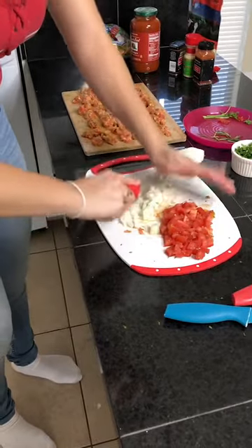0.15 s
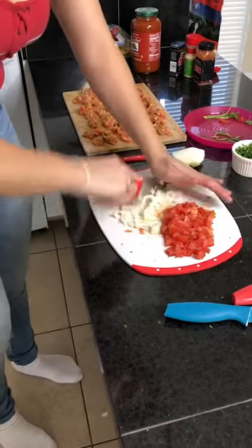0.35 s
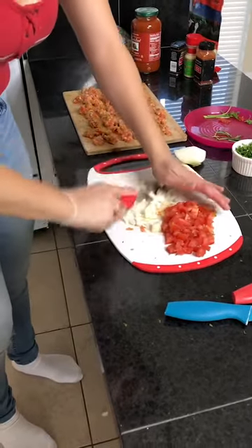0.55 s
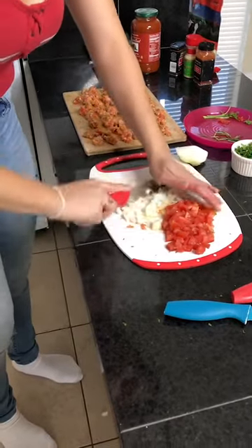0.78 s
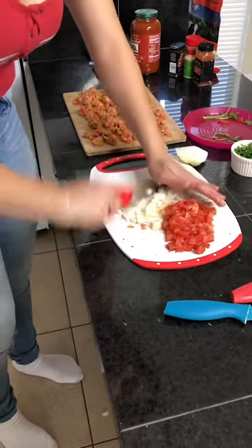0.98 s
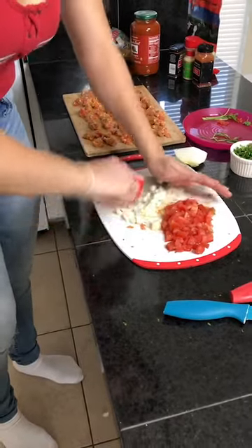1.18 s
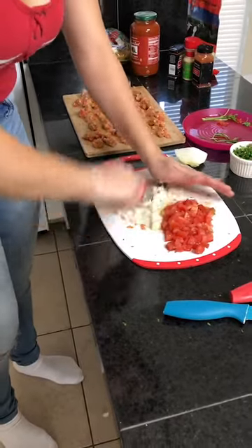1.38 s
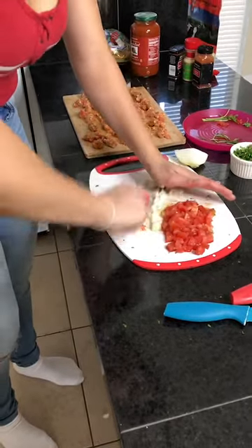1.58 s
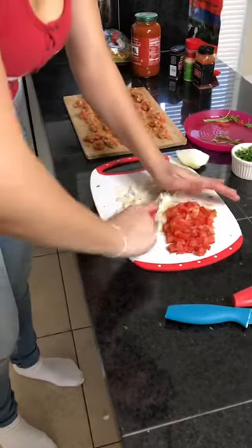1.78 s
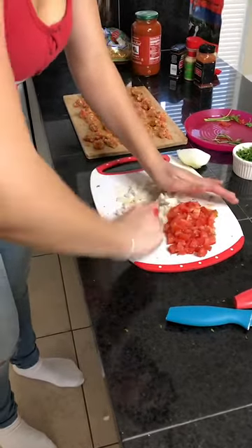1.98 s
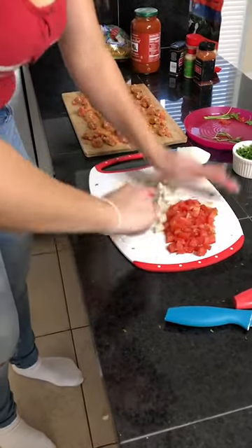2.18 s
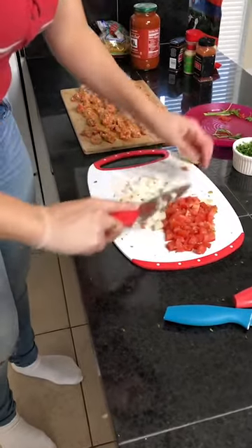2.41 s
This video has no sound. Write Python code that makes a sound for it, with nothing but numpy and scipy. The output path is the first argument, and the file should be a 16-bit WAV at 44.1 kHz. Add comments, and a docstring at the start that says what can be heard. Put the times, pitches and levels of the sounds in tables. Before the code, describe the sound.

A small knife chops onion on a plastic board, eight even strokes about a quarter second apart, starting at 0.2 seconds. Each is a short wet crunch with a hollow knock, and faint snaps of onion fall between them. The last stroke, at about 2 seconds, lands hardest with a sharp clack. The small kitchen adds a brief echo, and a faint, low appliance hum runs throughout.

```python
"""Chopping onion

A small knife chops onion on a plastic board in a kitchen: eight strokes, about four a second.
Each is a wet crunch of bursting cells, with knocks as the blade breaks through layers and meets
the board. The counter and a small, hard room answer, over the low hum of an appliance."""
import sys
import numpy as np
from scipy import signal
from scipy.fft import rfft, irfft, next_fast_len
from scipy.io import wavfile

SR = 44100
rng = np.random.default_rng(int(sys.argv[2]) if len(sys.argv) > 2 else 0)


def digitize_waveform(pressure):
    """Quantize a signal to 16-bit integers and store it at the path in sys.argv[1].

    Rows of a 2-D input are taken as channels; values are limited to [-1, 1].
    """
    field = np.atleast_2d(pressure).T
    bounded = np.clip(field, -1, 1)
    quanta = np.round(bounded * 32767).astype(np.int16)
    wavfile.write(sys.argv[1], SR, quanta)


N = 108045
T = np.arange(N) / SR

# The bright tone of bursting onion cells. Each row: frequency in Hz, relative level in dB.
CRUNCH_EQ = [(300, -20), (800, -6.5), (1500, 2), (2800, 2), (5000, 1), (8000, 0), (12000, -3), (16000, -3)]


def undb(db):
    """Decibels to gain."""
    return 10 ** (np.asarray(db) / 20)


def unit(x):
    """Scale to rms 1."""
    return x / np.sqrt(np.mean(x ** 2))


def colour(x, points):
    """Minimum-phase EQ through (Hz, dB) points that keeps the power of white noise."""
    hz, db = np.array(points, float).T
    size = next_fast_len(2 * len(x), True) * 2
    bin_hz = np.arange(size // 2 + 1) * SR / size
    gain = unit(undb(np.interp(np.log(bin_hz + 1), np.log(hz), db)))
    cepstrum = irfft(np.log(gain))
    cepstrum[1:size // 2] *= 2
    cepstrum[size // 2 + 1:] = 0
    return irfft(rfft(x, size) * np.exp(rfft(cepstrum)))[:len(x)]


def fade(t60):
    """Decay of 60 dB in t60 seconds."""
    return np.exp(-np.log(1000) * T / t60)


def add(out, start, x):
    """Mix a sound in from its start time."""
    i = max(int(start * SR), 0)
    out[i:] += x[:N - i]


def drift(step_s):
    """A random glide with a spread near 1 and a new target every step."""
    return 1.17 * np.interp(T / step_s, np.arange(N), rng.standard_normal(N))


def appliance():
    """A low rush of air with a few wavering motor tones."""
    # The dark tone of the air. Each row: frequency in Hz, relative level in dB.
    air_eq = [(20, -32), (31, -32), (40, -34), (58, -1), (100, -4), (150, 2), (230, -3.5), (400, -6.5),
              (650, -12), (1100, -13), (2000, -23.5), (4000, -28.5), (9000, -37.5), (16000, -44.5)]
    # The motor's hum. Each row: frequency in Hz, rms level in dB.
    motor_tones = [(60.4, -69.5), (160.5, -66.5), (296, -66), (320.7, -72.5), (473.5, -71)]
    air_db, waver_hz = -52.5, 1.17
    out = undb(air_db) * unit(colour(rng.standard_normal(N), air_eq))
    for hz, db in motor_tones:
        cycles = np.cumsum(hz + waver_hz * drift(step_s=0.1195)) / SR
        out += undb(db) * np.sqrt(2) * np.sin(2 * np.pi * cycles)
    return out


def cell_bursts():
    """A dense crackle of tiny pops, mostly weak, surging as each layer of onion gives way."""
    bursts_per_s, spread_db, surge_db = 7000, 2, 2
    bursts = rng.random(N) < bursts_per_s / SR
    db = spread_db * np.minimum(rng.exponential(size=N), 4) + surge_db * drift(step_s=0.003)
    return unit(bursts * np.sign(rng.standard_normal(N)) * undb(db))


def loose_pieces():
    """Bits of onion snap or are nudged, and once the blade brushes lightly over the pile."""
    # Small snaps. Each row: start in seconds, level in dB, decay time constant in seconds.
    snap_cues = [(0.114, -55.5, .004), (0.5015, -49.5, 0.0047), (0.769, -55, 0.0073), (0.8263, -43, .0015),
                 (1.122, -47.5, 0.0068), (1.2665, -73, 0.0031), (2.187, -62, 0.0053)]
    # The rasp of the brush. Each row: frequency in Hz, relative level in dB.
    brush_eq = [(500, -14), (1400, 4), (2500, 5.5), (4000, -5), (7500, -7.5), (11000, 0.5), (13500, -5),
                (16000, -17)]
    brush_start_s, brush_length_s, brush_db = 1.674, 0.036, -53
    progress = np.clip((T - brush_start_s) / brush_length_s, 0, 1)
    brush = undb(brush_db) * np.sqrt(np.abs(np.sin(np.pi * progress)))
    snaps = np.zeros(N)
    for start, db, decay in snap_cues:
        add(snaps, start, undb(db) * np.exp(-T / decay))
    return colour(snaps * cell_bursts(), CRUNCH_EQ) + colour(brush * cell_bursts(), brush_eq)


def knife_cuts():
    """Force grows as the blade sinks in; cells burst and shake the board until the blade stops."""
    # Each row is a stroke: start, rise and hold in seconds, crunch level in dB,
    # board shake level in dB, crunch brightness in dB per octave.
    strokes = [(0.23, 0.024, 0.0058, -43.5, -43.5, 0.5), (0.515, 0.029, 0.015, -45, -43.5, 2),
               (0.786, 0.041, 0.012, -45, -47, -0.8), (1.035, 0.015, 0.017, -44.5, -44.5, 0.5),
               (1.274, 0.0048, 0.022, -41.5, -43.5, 0.2), (1.543, 0.0067, 0.023, -43.5, -46.5, -1),
               (1.779, .005, 0.043, -45.5, -46, 0), (2.011, 0.0042, 0.049, -42.5, -42, -1.2)]
    # The body of the shaken board. Each row: frequency in Hz, relative level in dB.
    board_eq = [(150, -15.5), (350, -7.5), (600, -15), (850, -2), (1100, -2), (1450, -9.5), (2200, -15),
                (4000, -31.5), (10000, -51)]
    entry_force, entry_s, release_s = 0.66, 0.0026, 0.0052
    touch_db, touch_s = -11.5, 0.0089  # the edge eases into the skin before it breaks through
    crunch, shake = np.zeros(N), np.zeros(N)
    for start, rise, hold, crunch_db, shake_db, tilt in strokes:
        age = T - start
        attack = np.clip(age / entry_s, 0, 1)
        press = entry_force + (1 - entry_force) * np.clip(age / rise, 0, 1)
        release = np.exp(-np.maximum(age - rise - hold, 0) / release_s)
        touch = undb(touch_db) * np.exp(-np.abs(age) / touch_s)
        force = np.maximum(attack * press * release, touch)
        tilted_eq = [(hz, db + tilt * np.log2(hz)) for hz, db in CRUNCH_EQ]
        crunch += colour(undb(crunch_db) * force * cell_bursts(), tilted_eq)
        shake += undb(shake_db) * force
    return crunch + colour(shake * cell_bursts(), board_eq)


def ring(modes, pitch, detune):
    """Struck modes, tuned slightly differently at each spot on the board."""
    tuning = pitch * (1 + detune * rng.standard_normal(len(modes)))
    return sum((-1) ** (k // 2) * undb(db) * fade(t60) * np.sin(2 * np.pi * hz * tuning[k] * T)
               for k, (hz, db, t60) in enumerate(modes))


def board_knocks():
    """The edge cracks and clacks on the plastic, then the board gives a short hollow thud."""
    # Each row is a knock: start in seconds, thud peak in dB, thud pitch ratio, clack peak in dB,
    # relative crack level in dB.
    hits = [(.2280, -34.5, 0.97, -55, -57), (.2428, -31.5, 0.99, -48, -44), (0.2548, -34.5, 1.54, -31, -29),
            (0.2672, -32, 0.74, -45, -48), (0.5417, -27, 0.92, -30.5, -40),
            (0.5541, -23.5, 1.01, -25.5, -43), (0.7843, -34, 1.43, -39.5, -46),
            (0.8166, -35, 0.86, -38, -41), (1.0510, -28.5, 0.94, -35, -44), (1.0558, -30.5, 0.98, -34, -42),
            (1.2764, -24.5, 0.99, -30.5, -45), (1.5682, -37, 1.04, -43, -50), (1.788, -36, 0.84, -39, -33),
            (1.8089, -43, 0.86, -28, -28), (1.8153, -27, 1.14, -22.5, -57), (1.8209, -35, 1.05, -35.5, -46),
            (2.0148, -22.5, 1.1, -30.5, -28), (2.0487, -18, 1.11, -15, -15)]
    # The board's modes. Each row: frequency in Hz, relative level in dB, 60 dB decay in seconds.
    thud_modes = [(783, -9, 0.019), (930, -2, 0.021), (1088, 10, 0.01), (1282, -14.5, 0.016),
                  (1680, 1.5, 0.014)]
    # The modes of the blade and the surface under it, with the same columns.
    clack_modes = [(1457, -2, 0.013), (1982, -3, .018), (2507, -6, 0.0079), (2967, 1.5, 0.0052),
                   (3660, -3, 0.0033), (4240, -2, 0.0055)]
    thud_lag_s, thud_attack_s = 0.00113, 0.00055  # the board bends a moment after the edge touches
    crack_decay_s = 0.00051
    out = np.zeros(N)
    for start, thud_db, pitch, clack_db, crack_db in hits:
        thud = ring(thud_modes, pitch, detune=0.018) * (1 - np.exp(-(T / thud_attack_s) ** 2))
        clack = ring(clack_modes, pitch=1, detune=0.015)
        crack = rng.standard_normal(N) * np.exp(-T / crack_decay_s) / 2
        add(out, start + thud_lag_s, undb(thud_db) * thud / np.abs(thud).max())
        add(out, start, undb(clack_db) * clack / np.abs(clack).max() + undb(crack_db) * crack)
    return out


def kitchen(x):
    """Quick reflections from the counter and jars, then a room tail whose treble dies first."""
    # The tone of the tail. Each row: frequency in Hz, relative level in dB.
    room_eq = [(100, -0.5), (500, -1), (1100, -1.5), (2500, -2.5), (4500, -0.5), (8500, -1), (16000, -6)]
    room_db, crossover_hz, build_s = -9, 4500, 0.007
    counter_db, counter_decay_s, predelay_s, echoes_per_s = -13.5, 0.0041, 0.002, 2500
    noise = rng.standard_normal(N)
    low = signal.sosfilt(signal.butter(1, crossover_hz, fs=SR, output="sos"), noise)
    low = signal.sosfilt(signal.butter(1, crossover_hz, fs=SR, output="sos"), low[::-1])[::-1]
    tail = low * fade(t60=0.57) + (noise - low) * fade(t60=0.35)
    tail *= np.clip(T / build_s - 0.5, 0, 1)
    echoes = rng.standard_normal(N) * (rng.random(N) < echoes_per_s / SR)
    echoes *= np.exp(-T / counter_decay_s) * (T > predelay_s)
    response = undb(room_db) * colour(unit(tail), room_eq) + undb(counter_db) * unit(echoes)
    return x + signal.fftconvolve(x, response / np.sqrt(N))[:N]


def scene():
    """The chopping in the kitchen, over the hum."""
    chopping = knife_cuts() + loose_pieces() + board_knocks()
    return (kitchen(chopping) + appliance())[None]


def record(dry):
    """Roll off the deep bass and cut the very top."""
    low_cut_hz, high_cut_hz = 38, 16300
    dry = signal.sosfilt(signal.butter(4, low_cut_hz, "high", fs=SR, output="sos"), dry)
    return signal.sosfilt(signal.ellip(10, .2, 80, high_cut_hz, fs=SR, output="sos"), dry)


dry = scene()
out = record(dry)
digitize_waveform(out)
```